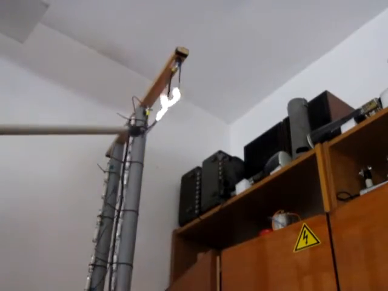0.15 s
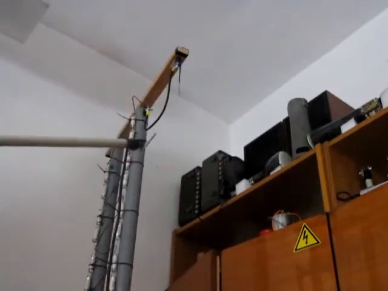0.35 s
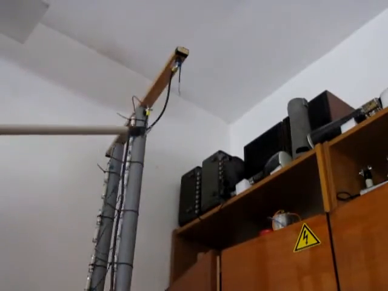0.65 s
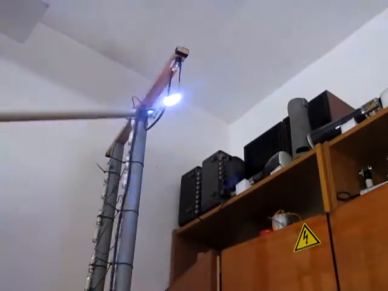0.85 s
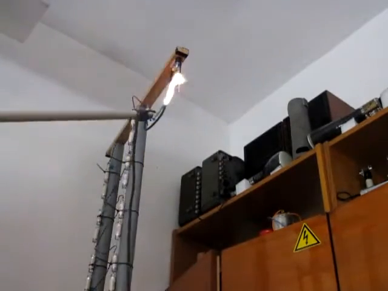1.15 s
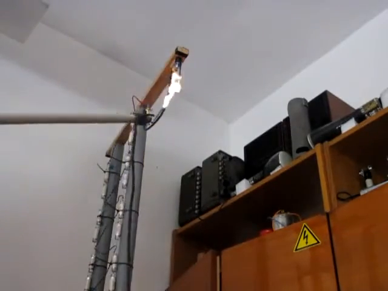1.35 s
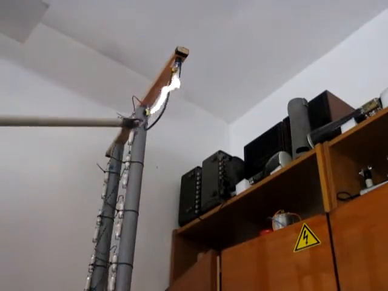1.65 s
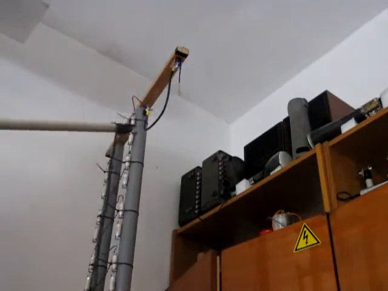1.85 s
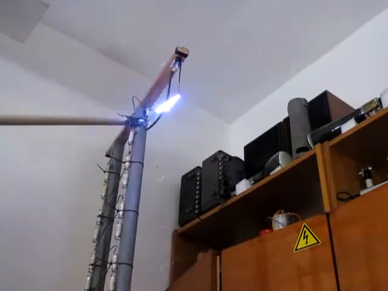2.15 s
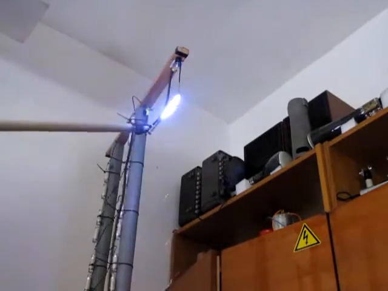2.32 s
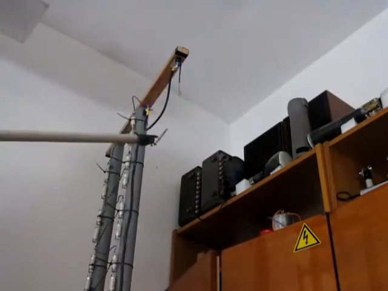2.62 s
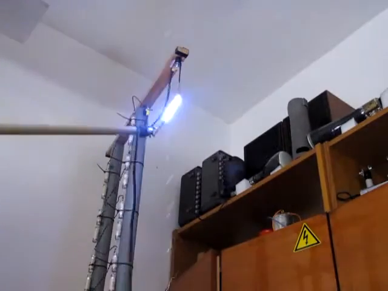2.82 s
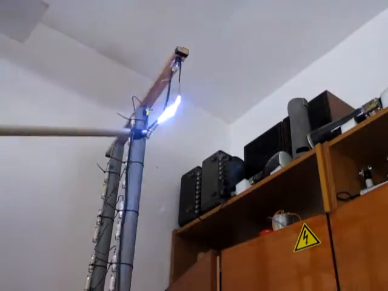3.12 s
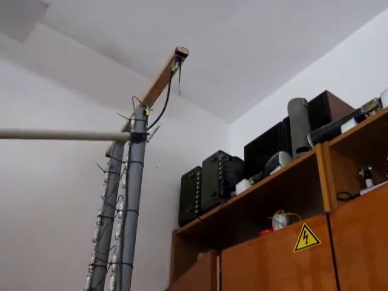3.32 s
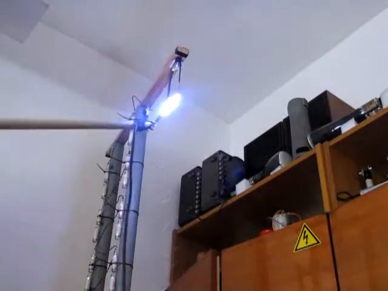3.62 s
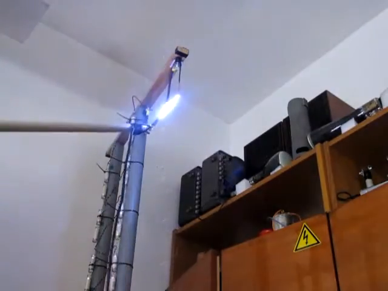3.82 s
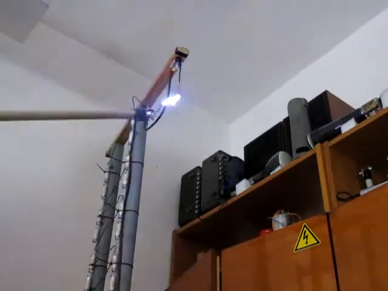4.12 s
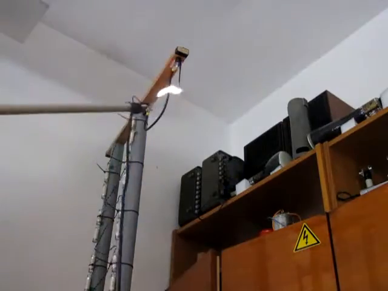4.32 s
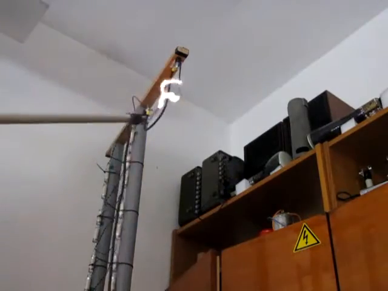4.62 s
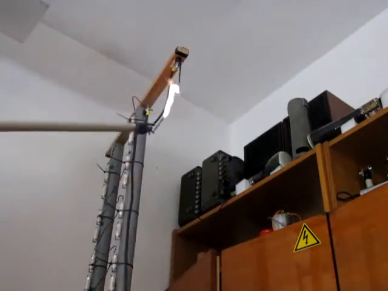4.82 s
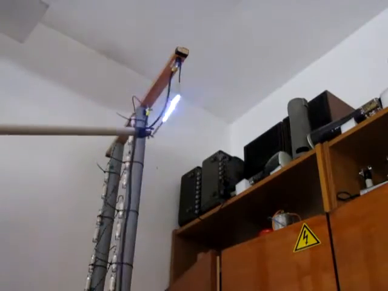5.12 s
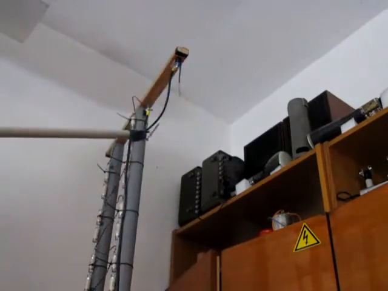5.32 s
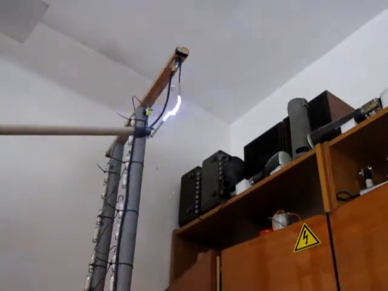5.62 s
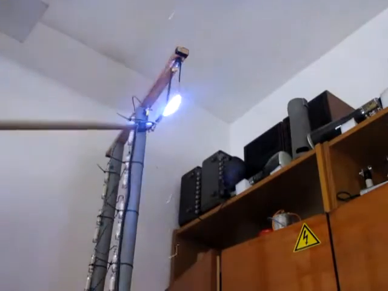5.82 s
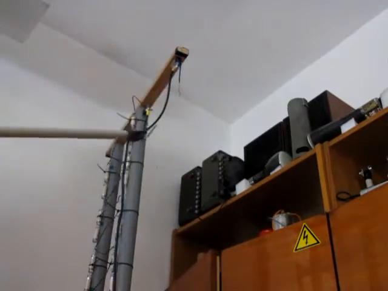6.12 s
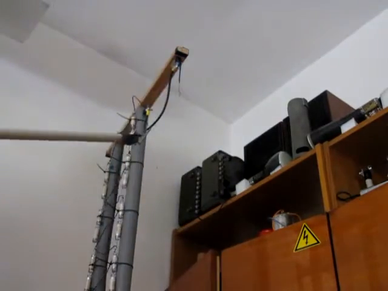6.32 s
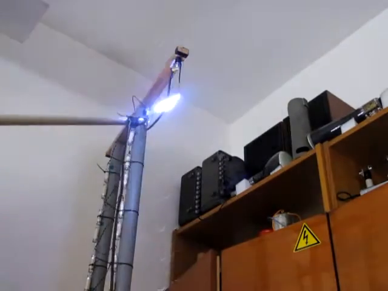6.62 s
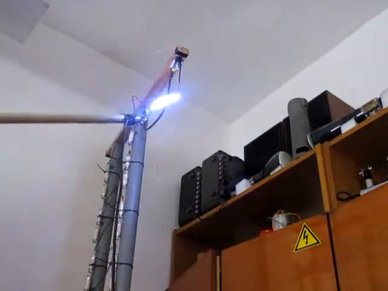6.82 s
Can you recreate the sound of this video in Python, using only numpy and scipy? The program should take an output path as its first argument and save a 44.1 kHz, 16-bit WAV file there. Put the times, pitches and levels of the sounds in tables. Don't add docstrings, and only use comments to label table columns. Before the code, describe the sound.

Loud electrical buzzing cracks and brief sputtering arcs burst irregularly close to the microphone, with overload thumps and short room echo.

```python
import sys
import numpy as np
from scipy import signal
from scipy.fft import rfft, irfft
from scipy.io import wavfile
from scipy.ndimage import uniform_filter1d

SR = 44100
rng = np.random.default_rng(int(sys.argv[2]) if len(sys.argv) > 2 else 0)


def makeup_ratio(level_db):
    decades = np.asarray(level_db, float) / 20
    return 10 ** decades


def wav_record(signal):
    frames = np.transpose(np.atleast_2d(signal))
    bounded = np.clip(frames, -1, 1)
    quanta = np.round(bounded * 32767).astype(np.int16)
    wavfile.write(sys.argv[1], SR, quanta)


N = 306495


def unit(x):
    return x / np.sqrt(np.sum(x ** 2, -1, keepdims=True))


def read(points, hz):
    f, value = np.transpose(points)
    return np.interp(np.log(hz + 1), np.log(f + 1), value)


def add(mix, start_s, sound):
    part = mix[..., max(round(start_s * SR), 0):][..., :sound.shape[-1]]
    part += sound[..., :part.shape[-1]]


def paired(x, db, size):
    # frequency in Hz, left-right likeness from 0 to 1.
    likeness = [(60, .7), (640, .35), (1410, .4), (3100, .1), (6820, 0), (15000, .1)]
    hz, t, z = signal.stft(x, SR, nperseg=size)
    same = np.clip(read(likeness, hz), -1, 1)[:, None]
    right = same * z[0] + np.sqrt(1 - same ** 2) * z[1]
    z = np.array([z[0], right]) * makeup_ratio(db(hz[:, None], t))
    return signal.istft(z, SR, nperseg=size)[1][:, :x.shape[1]]


def floor(level_db=-63.5, treble_db=0.5, lull_treble_db=-3.5):
    # frequency in Hz, level in dB per Hz.
    air_colour = [(15, -20), (25, -4), (70, -26), (145, -15), (384, -22.5), (695, -18), (962, -26),
                  (2840, -23.5), (11000, -26.5), (16000, -37.5)]
    lull_start_s, lull_end_s, lull_fade_s = 4.62, 4.89, .15

    def shape(hz, t):
        lull = np.clip((t - lull_start_s) / lull_fade_s, 0, 1) * (t < lull_end_s)
        tilt_db = treble_db + lull_treble_db * lull
        return read(air_colour, hz) + tilt_db * np.log2(1 + hz / 2000)

    air = paired(rng.standard_normal((2, N)), shape, size=2048)
    return makeup_ratio(level_db) * unit(air) * np.sqrt(N)


def crack(near_surfaces=True, twist=-0.6):
    # frequency in Hz, level in dB per Hz.
    spark_colour = [(88, -46), (150, -11.5), (484, -9), (662, -11.5), (1020, -11.5), (1240, -11.5),
                    (1690, -8), (1940, -9), (2650, -5), (2870, -6.5), (4160, -4), (12700, -9),
                    (16000, -22.5)]
    # frequency in Hz, width in Hz, height in dB.
    humps = [(2710, 120, 1.5), (4200, 130, 2.5), (5150, 200, 2)]
    hz = abs(np.fft.fftfreq(4096, 1 / SR))
    db = read(spark_colour, np.clip(hz, 160, 15500))
    if near_surfaces:
        db = db + sum(height / (1 + ((hz - f) / wide) ** 2) for f, wide, height in humps)
    bass_loss = hz ** 2 / (hz ** 2 + 300 ** 2)
    log_gain = np.log(makeup_ratio(db) * bass_loss + 1e-5)
    pulse = np.fft.ifft(np.exp(np.conj(signal.hilbert(log_gain)))).real
    pulse = -(signal.hilbert(np.roll(pulse, 26)) * np.exp(-1j * twist)).real[:2048]
    return unit(pulse * np.minimum(np.arange(2048) / 20, 1))


def flares(grain_db=2.0, grains_per_s=9000, tick_ms=10):
    # centre in seconds, level in dB, length in ms, brightness in dB per octave.
    arcs = [(0.058, -15, 14, -1.5), (0.09, -14.5, 20, -2), (0.746, -27, 81, 6), (0.807, -31, 7.6, 6),
            (.9, -56, 56, 0), (1.087, -20.5, 6.3, 2), (1.155, -37, 9.4, -6.5), (1.226, -14.5, 12.7, -1.5),
            (1.343, -42, 21, -8), (1.42, -13, 17, -0.5), (1.477, -17.5, 8.6, -3), (1.551, -15.5, 28, -0.5),
            (1.588, -17, 26, -1), (4.041, -39.5, 27, 6), (4.336, -32.5, 9.5, -9), (4.343, -22.5, 13, 1.5),
            (4.376, -37, 11, 8.5), (4.495, -15.5, 10.9, 1.5), (4.575, -35, 12, 0), (4.889, -15.5, 8.8, 0),
            (4.964, -16.5, 26, -1), (6.878, -19, 18, 1.5)]
    # centre in
    # seconds, level in dB, brightness in dB per octave.
    ticks = [(.004, -51, -9), (0.519, -58, 2), (.534, -50, -4.5), (.557, -49.5, -3.5), (1.066, -48, -13),
             (1.949, -46.5, -4), (1.979, -57.5, -2.5), (3.288, -46, 2.5), (4.432, -48, 3), (4.683, -45, -4),
             (4.727, -51, -10), (4.791, -57, -8), (4.82, -64, -13), (5.48, -53.5, 1), (5.491, -56.5, 5.5)]
    # centre in seconds, level in dB, length in ms.
    whines = [
        [(.79, -32, 40), (.81, -28, 20), (.878, -52, 19), (.912, -43, 22), (1.0, -58, 56), (4.37, -23.5, 11),
         (4.384, -25, 9.9), (4.42, -53, 20), (4.498, -26.5, 10), (1.588, -42, 25)],
        [(.748, -33, 38), (.785, -33, 24), (.82, -34, 22), (.88, -61, 25), (.94, -57, 65), (4.043, -29.5, 32),
         (4.369, -22, 8.2), (4.43, -61, 20), (1.421, -51, 17)],
    ]
    # frequency in Hz, level in dB, t60 in seconds.
    ring_modes = [
        [(5904, 7, 0.081), (6040, 2.5, 0.017), (5630, -2.5, 0.0026), (12200, -2, 0.04), (11800, -7.5, 0.01)],
        [(7900, 8, 0.03), (7880, 5, 0.016), (567, -17.5, 0.061)],
    ]

    sputter = rng.standard_normal(N) * makeup_ratio(grain_db * rng.exponential(1, N))
    sputter = sputter * (rng.random(N) < grains_per_s / SR)
    sputter = unit(sputter) * np.sqrt(N)
    dull = signal.lfilter(*signal.butter(1, 3500, fs=SR), sputter)
    bright = sputter - dull

    swells = np.zeros((2, N))
    for centre_s, db, ms, bright_db in arcs + [(s, db, tick_ms, tilt) for s, db, tilt in ticks]:
        shares = makeup_ratio([db - bright_db, db + 2 * bright_db])
        add(swells, centre_s - ms / 2000, np.outer(shares, np.hanning(round(ms * SR / 1000) + 2)))
    hiss = swells[0] * dull + swells[1] * bright
    hiss = signal.lfilter(*signal.butter(2, 60, "high", fs=SR), hiss)
    hiss = hiss - 0.43 * signal.lfilter(*signal.iirpeak(480, .9, fs=SR), hiss)

    t = np.arange(SR // 2) / SR
    whine = np.zeros(N)
    for rows, modes in zip(whines, ring_modes):
        swell = np.zeros(N)
        for centre_s, db, ms in rows:
            add(swell, centre_s - ms / 2000, makeup_ratio(db) * np.hanning(round(ms * SR / 1000) + 2))
        ring = sum(makeup_ratio(db) * unit(makeup_ratio(-60 * t / t60) * np.sin(2 * np.pi * f * t)) for f, db, t60 in modes)
        whine += signal.fftconvolve(swell * sputter, ring)[:N]
    return hiss, signal.sosfilt(signal.butter(4, 430, "high", fs=SR, output="sos"), whine)


def sparks(sparks_per_s=600, jitter=.45, spread_db=2.0, first_db=9.5):
    # start in seconds, end in seconds, crest in dB, place of the crest from 0 to 1, sag by the end in dB.
    runs = [
        (0.574, 0.725, -12.5, .1, -2),
        (2.002, 2.013, -10.5, .4, 0.5),
        (2.044, 2.334, -13.5, .05, -2.5),
        (2.641, 3.021, -12.5, .3, -2.5),
        (3.333, 3.983, -13, .3, -1.5),
        (4.979, 5.006, -17.5, .9, -1),
        (5.126, 5.153, -17, .85, -3),
        (5.514, 5.897, -13.5, .6, -6.5),
        (6.398, 6.739, -12.5, .1, -2.5),
        (6.919, 6.95, -11.5, .25, -3),
    ]
    opening_db, release_s, release_db = -3, .018, -17
    out = np.zeros(N)
    density_gain = np.sqrt(SR / sparks_per_s)
    for start, end, crest_db, place, sag_db in runs:
        crest_s = start + np.clip(place, .02, .98) * (end - start)
        s = [start, crest_s, end, end + release_s]
        db = crest_db + np.array([opening_db, 0, sag_db, sag_db + release_db])
        luck = rng.standard_normal((600, 2))
        waits = np.exp(jitter * luck[:, 0] - jitter ** 2 / 2)
        at = start + (np.cumsum(waits) - waits[0]) / sparks_per_s
        fired = at < min(s[-1], (N - 1) / SR)
        size = makeup_ratio(np.interp(at, s, db) + spread_db * luck[:, 1]) * density_gain
        size[0] = makeup_ratio(db[0] + first_db) * density_gain
        np.add.at(out, np.round(at[fired] * SR).astype(int), size[fired])
    return out


def tail():
    # frequency in Hz, t60 in seconds.
    decay = [(250, 0.21), (660, 0.34), (1740, 0.35), (4590, 0.33), (12100, 0.3)]
    taps = np.zeros((2, SR))
    at = np.arange(100, SR - 12, 12) + rng.integers(0, 12, (2, (SR - 101) // 12))
    np.put_along_axis(taps, at, rng.choice([-1., 1.], at.shape), 1)

    def fade(hz, t):
        return -60 * t / read(decay, hz)

    return unit(paired(taps, fade, size=256) * (np.arange(SR) > 100))


def evened(path):
    z = rfft(path)
    broad = uniform_filter1d(uniform_filter1d(abs(z) ** 2, size=90), size=90)
    even = irfft(z / np.sqrt(broad))
    return unit(even * (np.arange(even.shape[1]) < .75 * SR))


def room(x, direct_db=-5.0, early_db=-5.0, wander_hz=13.):
    out = np.zeros((2, N))
    turn = 2 * np.pi * wander_hz * np.arange(N) / SR
    lead = 200
    early_fade = np.exp(-np.arange(SR) / SR / 0.001)
    for k, right_at in enumerate((0, 1, 3, 1)):
        share = np.sqrt(2 / 4) * abs(np.cos(turn / 2 + k * np.pi / 4))
        far = tail()
        path = far + makeup_ratio(early_db) * unit(far * early_fade)
        path[[0, 1], [1, right_at]] += makeup_ratio(direct_db) / 1.395
        path = evened(np.roll(path, lead, axis=1))
        out += signal.fftconvolve((x * share)[None], path, axes=1)[:, lead + 1:N + lead + 1]
    return out


def thumps(depth=1.0, hold=0.65):
    # start in seconds, depth from 0 to 1, length in ms.
    right_knocks = [(2.0082, 0.37, 1.7), (2.1846, 0.4, 1.9), (2.1888, 0.6, 2.9), (2.219, .6, 1.05),
                    (2.2525, 0.45, 1.1), (2.2799, 0.4, 2.1), (2.316, 0.7, 2.45), (2.3333, 0.33, 2.7),
                    (2.6592, 0.65, 2.7), (2.6743, 0.3, 5), (2.6976, 0.6, 1.84), (2.7722, 0.33, 2.5),
                    (3.3435, 0.73, 2), (3.361, 0.54, 1.8), (3.4712, 0.18, 2.9), (3.749, .42, 1.5),
                    (3.806, .44, 1.55), (4.9996, 1, 2.06), (5.1404, 0.62, 4.2), (5.5387, 0.65, 1.97),
                    (5.5454, .5, 1.8), (5.558, .47, 1.06), (5.5784, .33, 2.1), (5.638, 0.73, 2.8),
                    (5.6957, 0.37, 1.4), (5.7373, 0.57, 2.2), (5.7862, 0.6, 3.3), (5.8378, .46, 1.9),
                    (5.8612, .53, 2.3), (6.7495, .6, 2.6)]
    # start in seconds, left depth and right depth from 0 to 1, length in ms.
    both_knocks = [(0.6107, .27, 0.66, 2.53), (3.0002, 0.14, .52, 2.2), (3.517, 0.35, 0.08, 1.6),
                   (3.6356, 0.32, 0.4, 1.7), (3.6985, 0.4, 0.47, 4.5), (3.7817, 0.22, .14, 2.5),
                   (3.8112, 0.2, 0.42, 2.2), (6.461, .3, 0.53, 1.55), (6.4989, 0.2, .52, 2.1),
                   (6.5088, 0.24, 0.2, 1.1), (6.5222, .53, 0.56, 2.2), (6.645, 0.23, .44, 3.2),
                   (6.6518, .4, 0.67, 2.4), (6.6808, .13, 0.6, 2.6), (6.687, .35, .5, 1.4),
                   (6.7067, .16, .6, 2.3), (6.7121, 0.4, .56, 1.8), (6.7235, .7, 0.54, 1.25),
                   (6.7344, .64, .7, 2.4), (6.7412, .9, 0.1, 2.4), (6.8673, 0.46, 0.54, 6.2),
                   (6.9196, 0.9, 0.4, 5.2), (6.9262, .33, 0.6, 2.4), (6.9349, 0, 1, 4.3),
                   (6.9457, 0.35, 1, 3.7)]
    # start in seconds, end in seconds, mean right depth from 0 to 1.
    nudges = [
        (.595, 0.607, 0.16),
        (2.015, 2.278, 0.25),
        (2.643, 2.762, 0.19),
        (3.352, 3.505, 0.25),
        (3.597, 3.845, 0.13),
        (5.642, 5.8, 0.17),
        (6.409, 6.68, 0.21),
    ]
    nudge_gap_s, nudge_ms, nudge_left = .024, 1.6, 0.09
    out = np.zeros((2, N))
    knocks = both_knocks + [(s, 0, right, ms) for s, right, ms in right_knocks]
    for start, end, right in nudges:
        luck = rng.uniform(.5, 1.5, (30, 4))
        at = start + nudge_gap_s * (np.cumsum(luck[:, 0]) - luck[0, 0])
        for s, (a, b, c) in zip(at, luck[:, 1:]):
            if s < end:
                knocks.append((s, nudge_left * right * a, right * b, nudge_ms * c))
    for s, left, right, ms in knocks:
        u = np.arange(round(3 * ms * SR / 1000)) / (ms * SR / 1000)
        jump = np.clip(u * ms / 0.05, 0, 1)
        slide = np.exp(-(np.maximum(u - hold, 0) / 0.39) ** 2)
        add(out, s, depth * np.outer([left, right], jump * slide))
    return out


def scene():
    hiss, whine = flares()
    spark_sound = signal.fftconvolve(sparks(), crack())
    arc_sound = signal.fftconvolve(hiss, crack(near_surfaces=False))
    dry = (spark_sound + arc_sound)[:N] + whine
    return room(dry) * makeup_ratio([[-.2], [.2]]) + floor()


def hushed(x):
    # attack in seconds, wiped length in ms.
    wipes = [(.0535, 4), (.5715, 5), (1.083, 8), (1.22, 5), (1.411, 11), (1.997, 14), (2.639, 7), (4.33, 4),
             (4.882, 3), (5.51, 3), (6.397, 4)]
    wipe = np.zeros(N)
    for attack_s, ms in wipes:
        add(wipe, attack_s - ms / 1000, signal.windows.tukey(round(ms * SR / 1000), .4))
    return x * makeup_ratio(-28 * wipe)


def top_cut(x):
    return signal.sosfilt(signal.butter(12, 16690, fs=SR, output="sos"), x)


def record(dry):
    knock = thumps()
    squeezed = dry * makeup_ratio(-14 * np.minimum(knock, .6))
    sag = 7 * uniform_filter1d(dry ** 2, 60, axis=1) ** 2
    x = .95 * np.tanh((squeezed - knock - sag) / .95)
    x = signal.sosfilt(signal.butter(2, 16, "high", fs=SR, output="sos"), x)
    x = hushed(x)
    treble_edge = signal.firwin(511, 16050, window=("kaiser", 8), fs=SR)
    x = signal.oaconvolve(x, treble_edge[None], "same", axes=1)
    return top_cut(x)


dry = scene()
out = record(dry)
wav_record(out)
```